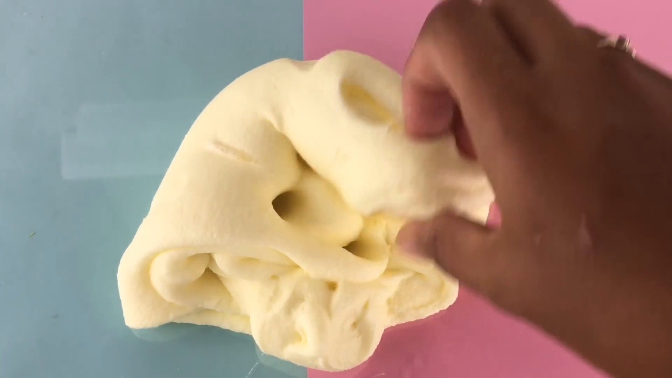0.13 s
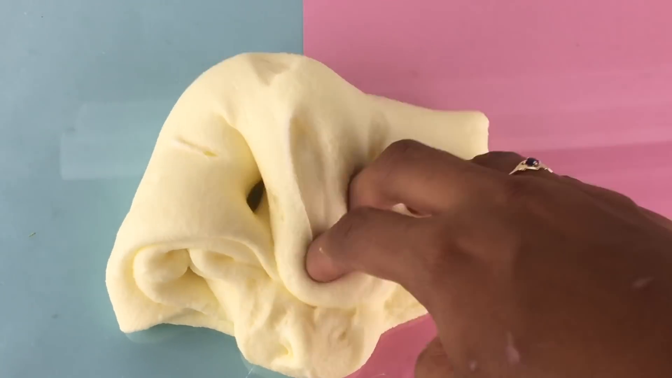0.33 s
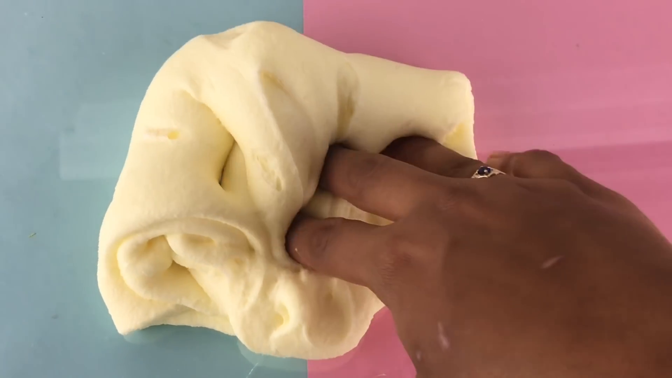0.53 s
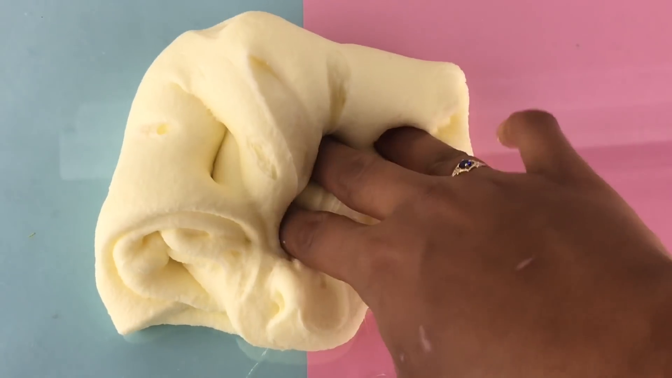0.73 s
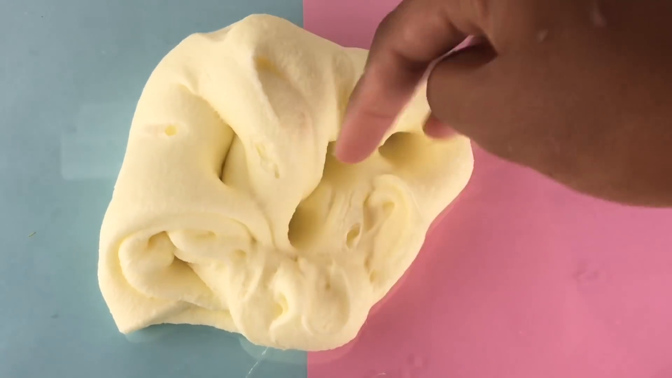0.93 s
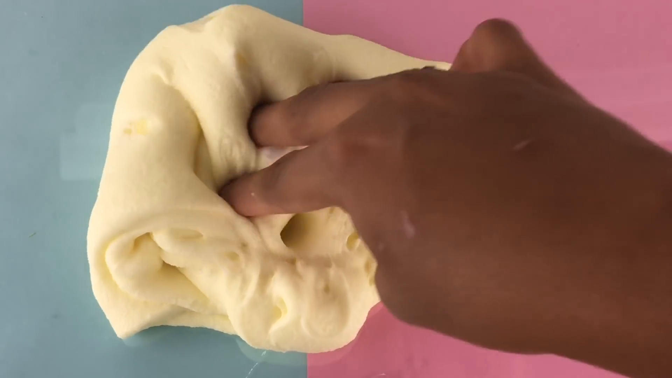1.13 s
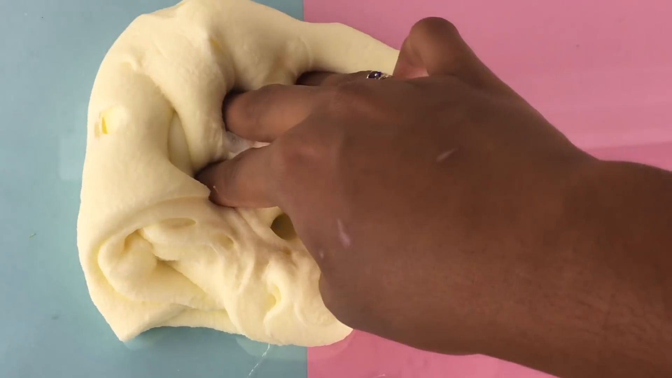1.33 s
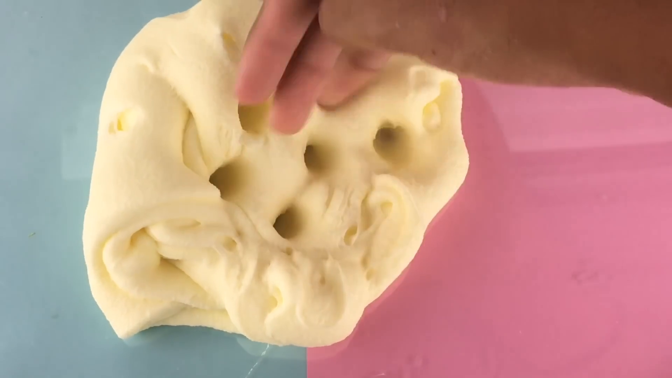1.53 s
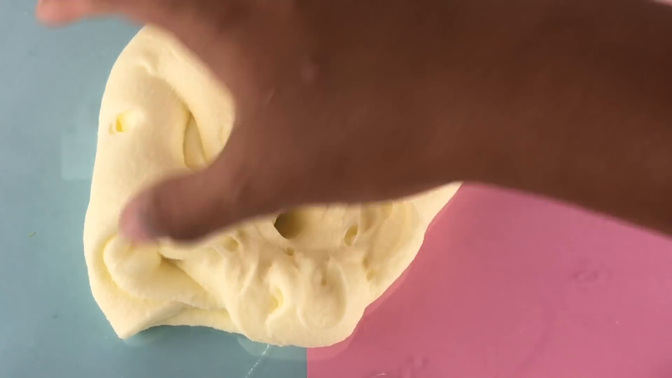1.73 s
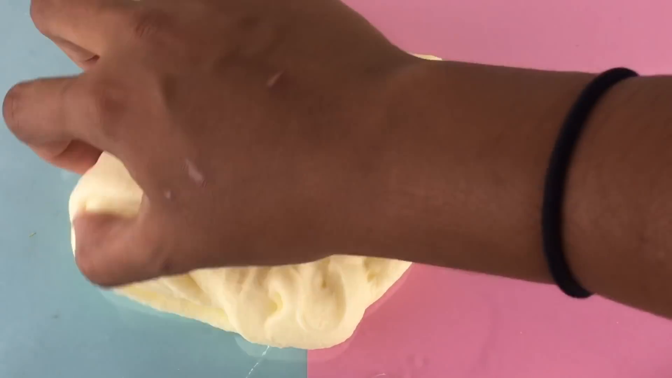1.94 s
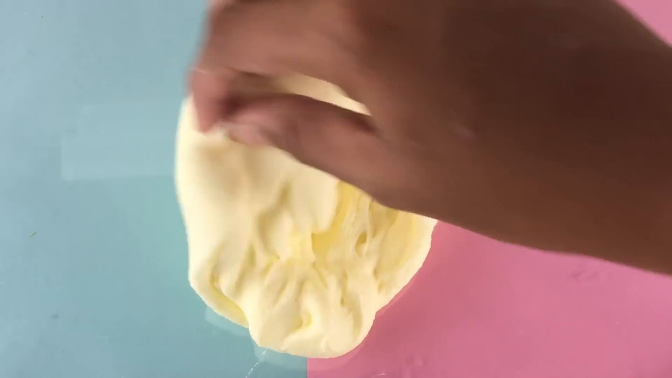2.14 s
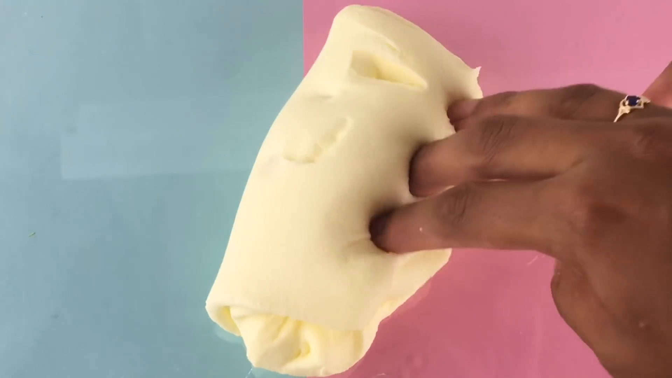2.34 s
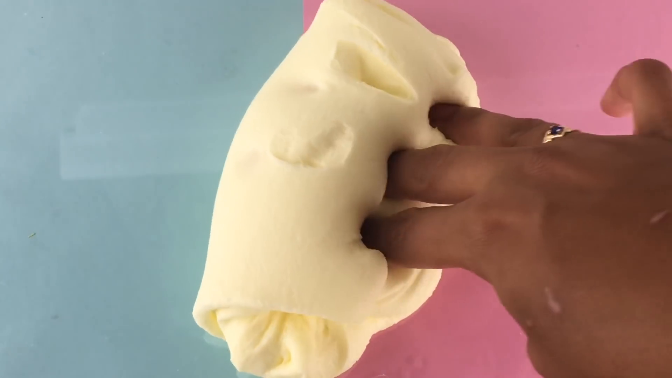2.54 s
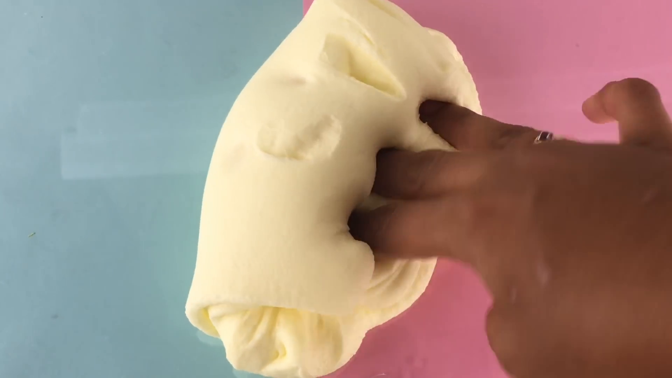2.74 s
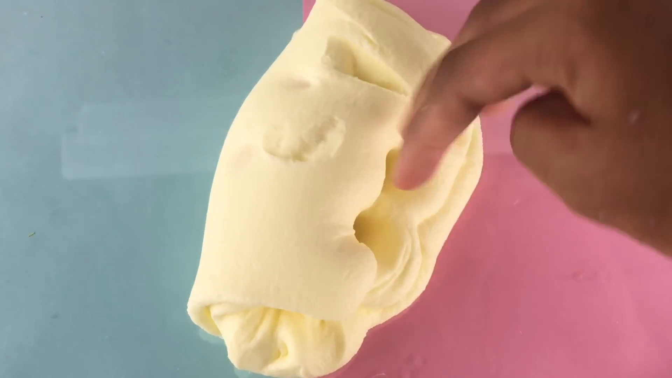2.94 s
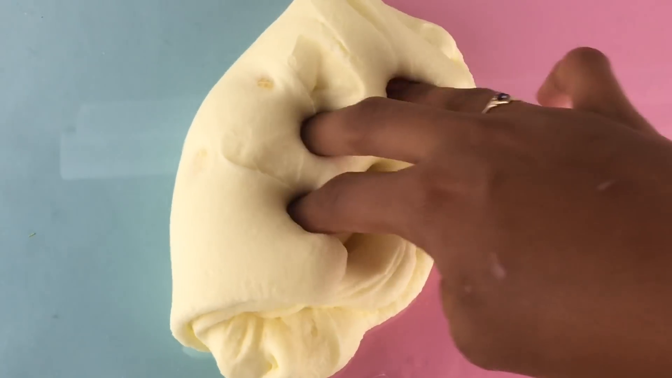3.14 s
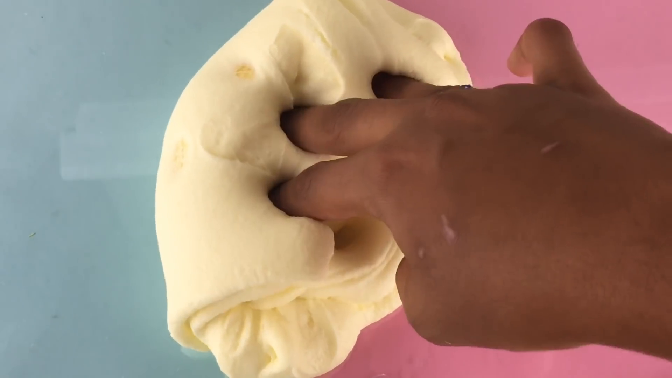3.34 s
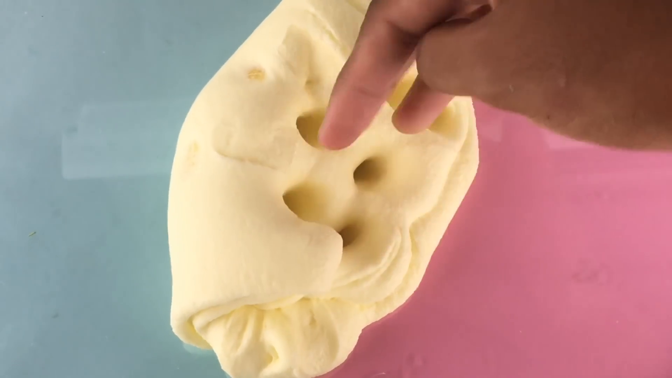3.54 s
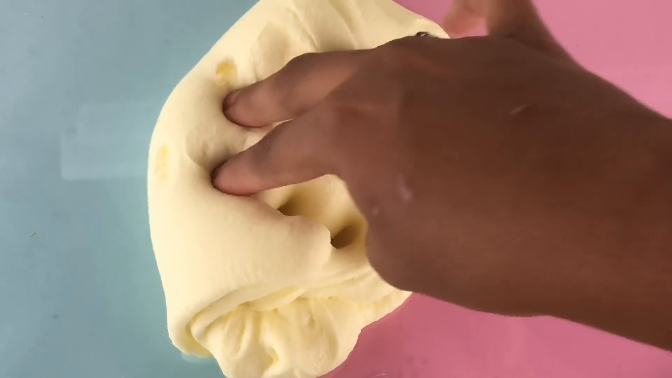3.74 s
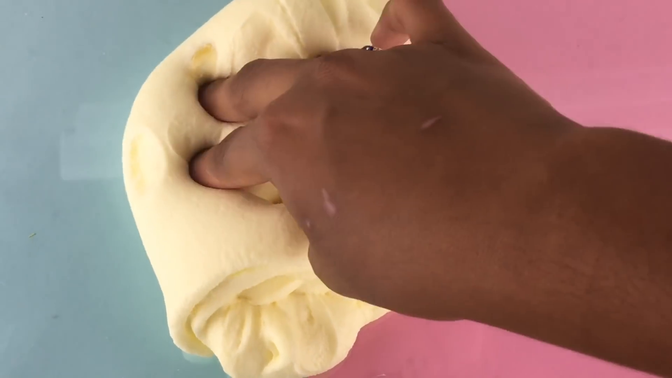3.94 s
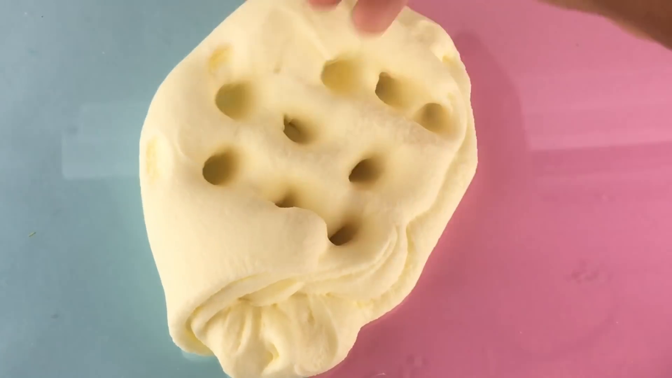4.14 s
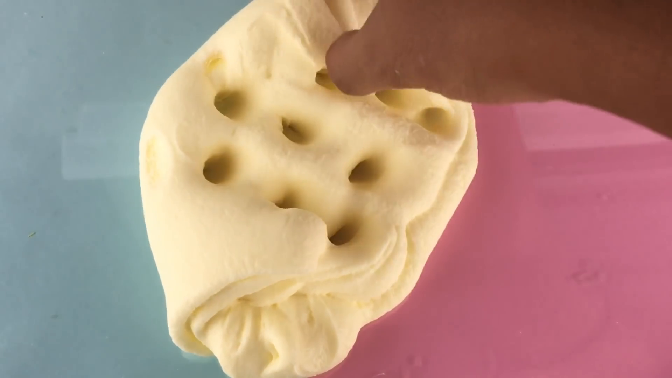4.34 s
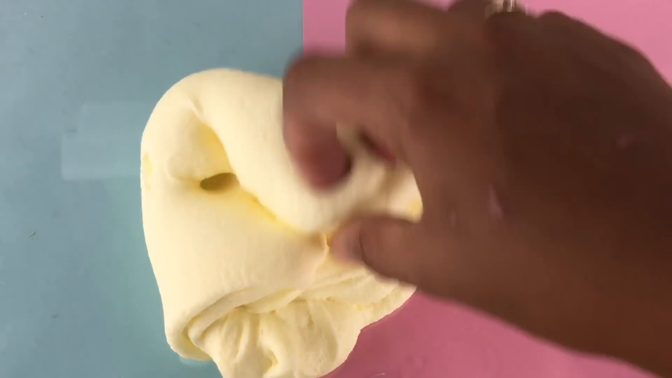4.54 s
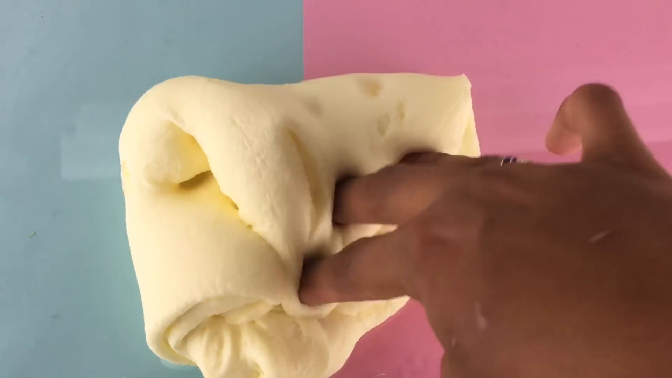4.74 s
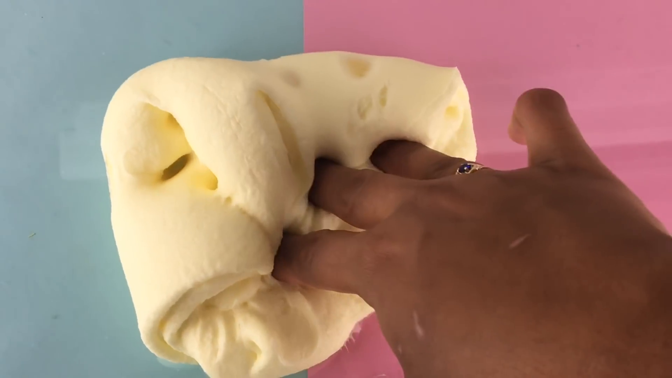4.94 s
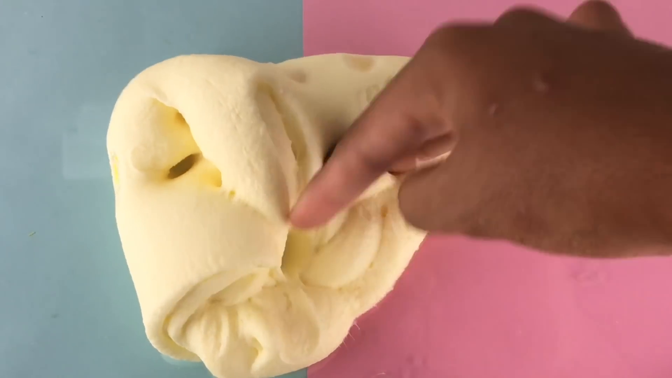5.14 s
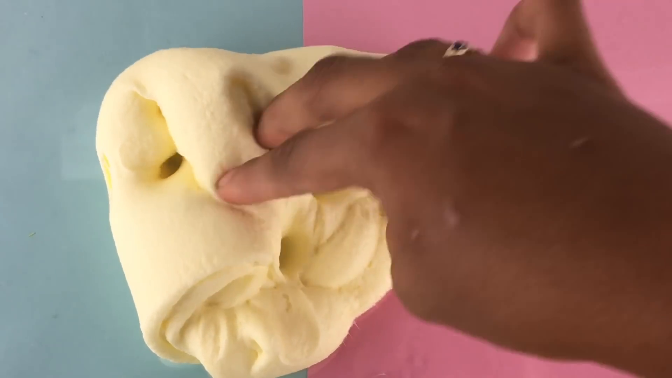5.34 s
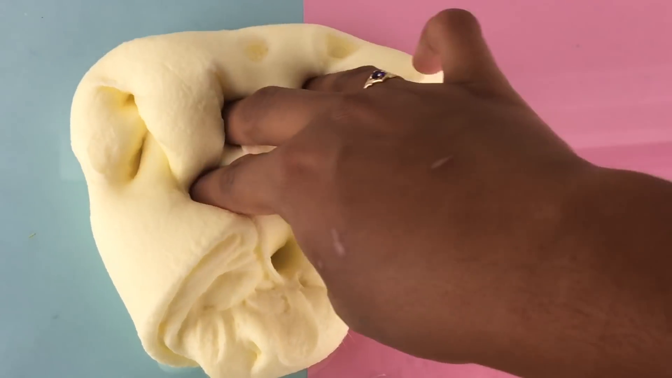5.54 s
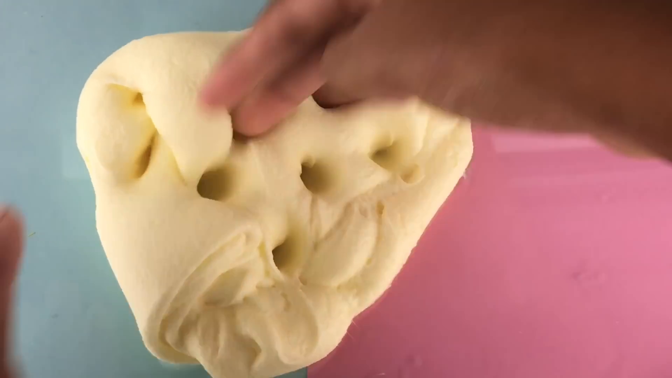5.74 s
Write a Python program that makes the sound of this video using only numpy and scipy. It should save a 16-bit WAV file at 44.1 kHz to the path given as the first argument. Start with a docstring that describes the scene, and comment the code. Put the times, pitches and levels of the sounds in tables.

```python
"""Fingers work thick slime on a table, close to the microphone in a quiet room; 5.9 s.
First the hand rubs the lump: skin peels off with a faint fizz, tiny bubbles tick.
From 0.85 s on, a finger pulls out seven times: the hole unseals with a wet snap and a hollow ring,
the lump recoils, then drops back with a soft thud; on most pulls a sticky film rips.
Between pulls the hand grips and folds the lump, and squeezed air pockets burst with a duller ping."""
import sys
import numpy as np
from scipy import signal
from scipy.fft import rfft, irfft, next_fast_len
from scipy.io import wavfile
from scipy.ndimage import map_coordinates

SR = 44100
rng = np.random.default_rng(int(sys.argv[2]) if len(sys.argv) > 2 else 0)


def put_to_file(sound):
    """Save the sound as 16-bit audio at rate SR, in the file named by the first command-line argument."""
    columns = np.atleast_2d(sound).T  # one column per channel
    safe = np.clip(columns, -1, 1)
    whole_steps = np.round(safe * 32767)
    wavfile.write(sys.argv[1], SR, whole_steps.astype(np.int16))


N = 259749
AGE_S = np.arange(SR // 10) / SR  # time axis of one short event

# fingers pulling out: unseal_s, fizz_db, recoil_db, drop_delay_s, drop_db
PULLS = [(0.852, -43.5, -29, 0.047, -40), (1.493, -47, -38, 0.1, -43.5), (2.826, -47, -35.5, 0.051, -41),
         (3.475, -48, -49.5, 0.031, -35.5), (4.081, -51.5, -38, .040, -35.5),
         (5.133, -50, -35.5, .087, -42.5), (5.746, -44.5, -38.5, 0.1, -41)]
# hand gripping, folding or sliding over the lump: start_s, length_s, fizz_db
RUBS = [(0, 0.23, -62), (0.256, 0.05, -91), (0.403, .11, -57.5), (1.966, 0.11, -48), (2.266, 0.043, -59),
        (3.168, 0.075, -63.5), (4.413, 0.024, -51), (4.529, .08, -57.5), (4.878, 0.09, -58),
        (5.392, 0.016, -55.5)]


def amp(db):
    return 10 ** (np.asarray(db) / 20)


def unit_rms(x):
    return x / np.sqrt(np.mean(x ** 2) + 1e-20)


def burst(x, level_db, window_s=0.0125):
    """Scale x to the energy of rms level_db held for window_s."""
    return amp(level_db) * x * np.sqrt(window_s * SR / (np.sum(x ** 2) + 1e-20))


def along(points, hz):
    """Interpolate (hz, value) points on a log frequency axis."""
    point_hz, values = np.transpose(points)
    return np.interp(np.log(hz + 1), np.log(point_hz), values)


def filtered(x, response):
    size = next_fast_len(len(x) + 8192)
    return irfft(rfft(x, size) * response(np.fft.rfftfreq(size, 1 / SR)), size)[:len(x)]


def resonate(x, hz, q):
    return filtered(x, lambda f: 1j * f * hz / q / (hz * hz - f * f + 1j * f * hz / q))


def muffle(x, edge_hz):
    """Low-pass: slime soaks up treble."""
    return signal.sosfilt(signal.butter(4, edge_hz, fs=SR, output="sos"), x)


def add(track, start_s, x):
    start = max(round(start_s * SR), 0)
    track[start:start + len(x)] += x[:max(len(track) - start, 0)]


def crackle(size, spread_db):
    """Countless micro-ruptures of unequal strength."""
    noise = rng.standard_normal(size)
    strength = amp(spread_db * np.clip(rng.standard_normal(size), -2.5, 2.5))
    return unit_rms(noise * strength)


def ring(hz, t60_s, attack_s, glide=0):
    """Damped tone; glide lifts the pitch, as when a cavity opens."""
    pitch_hz = hz * (1 + glide * (np.minimum(AGE_S / t60_s, 1) - 1 / 4))
    envelope = amp(-60 * AGE_S / t60_s) * (1 - np.exp(-AGE_S / attack_s))
    return np.sin(2 * np.pi * np.cumsum(pitch_hz) / SR) * envelope


def stroke(start_s, end_s, level_db, rise_db_per_s, fall_db_per_s):
    """Gain of one hand movement, held from start_s to end_s."""
    t = np.arange(N) / SR
    before_s, after_s = np.maximum(start_s - t, 0), np.maximum(t - end_s, 0)
    return amp(level_db - rise_db_per_s * before_s - fall_db_per_s * after_s)


def hush(level_db=-63.5):
    """Low room rumble and microphone hiss."""
    # noise floor spectrum: freq_hz, density_db
    spectrum = [(12, -28.5), (20, 3), (293, -14.5), (513, -17.5), (574, -25), (642, -18), (2020, -25),
                (3630, -25.5), (16000, -30.5)]
    return amp(level_db) * unit_rms(filtered(rng.standard_normal(N), lambda f: amp(along(spectrum, f))))


def room(x):
    """Reflections change as the hand moves: a new random tail every third of a second."""
    # reverberation time: freq_hz, t60_s
    decay_times = [(100, 0.52), (250, 0.21), (700, .45), (2000, 0.34), (5000, 0.38), (10000, 0.25),
                   (16000, 0.27)]
    # tail level re direct sound: freq_hz, gain_db
    gains = [(50, -3), (140, -9), (300, -14), (700, -14), (2000, -10), (5000, -15), (10000, -16),
             (16000, -10.5)]
    out, piece = np.zeros(N), SR // 3
    for start in range(0, N, piece):
        hz, t, noise = signal.stft(rng.standard_normal(SR * 2 // 3), SR, nperseg=256)
        fade = amp(-60 * t / along(decay_times, hz)[:, None])
        energy = np.sum(fade ** 2, axis=1, keepdims=True) * t[1] * SR
        fade *= amp(along(gains, hz))[:, None] / np.sqrt(energy)
        tail = signal.istft(noise * fade, SR, nperseg=256)[1]
        near = rng.standard_normal(len(AGE_S)) * np.exp(-AGE_S / 0.0036)  # table and arm scatter first
        add(tail, 0, amp(-13) * near / np.linalg.norm(near))
        add(out, start / SR + 0.003, signal.fftconvolve(x[start:start + piece], tail))
    return out


def peel(tugs_per_s=45, tug_db=2, clumps_per_s=890, clump_db=3.2):
    """Tacky threads let go of the skin in millisecond clumps, within slower tugs."""
    # fizz spectrum: freq_hz, density_db
    spectrum = [(200, -8.5), (600, 6), (1500, -3.5), (3000, -3), (6000, -5.5), (10000, -2), (13000, 4.5),
                (16000, -0.5)]
    t = np.arange(N) / SR
    pulling = sum(stroke(unseal_s - 0.016, unseal_s + 0.044, db, rise_db_per_s=849.5, fall_db_per_s=300)
                  for unseal_s, db, *_ in PULLS)
    rubbing = sum(stroke(start_s, start_s + length_s, db, rise_db_per_s=346, fall_db_per_s=170)
                  for start_s, length_s, db in RUBS)
    tugs = map_coordinates(rng.standard_normal(N // 100), [t * tugs_per_s])
    clumps = map_coordinates(rng.standard_normal(N // 10), [t * clumps_per_s])
    threads = crackle(N, spread_db=2.5) * amp(tug_db * tugs + clump_db * clumps)
    fizz = filtered(threads, lambda f: amp(along(spectrum, f)))
    return unit_rms(fizz) * (pulling + rubbing)


def thuds(recoil_hz=150, drop_hz=158):
    """The soft mass pushes the table, then settles with a dull shudder; each pull jolts it twice."""
    # lump flopping or pressed onto the table: start_s, level_db, pitch_hz
    flops = [(1.2162, -47, 180), (1.514, -37, 300), (1.9239, -33.5, 255), (3.1298, -42.5, 170),
             (4.222, -48, 145), (4.333, -30.5, 176)]
    recoils = [(unseal_s, db, recoil_hz) for unseal_s, _, db, _, _ in PULLS]
    drops = [(unseal_s + delay_s, db, drop_hz) for unseal_s, _, _, delay_s, db in PULLS]
    settling = np.exp(-AGE_S / 0.025) * np.linspace(1, 0, len(AGE_S))
    out = np.zeros(N)
    for start_s, level_db, hz in flops + recoils + drops:
        push = ring(hz, t60_s=2 / hz, attack_s=0.029, glide=0.075)  # lossy slime: about one cycle
        shudder = resonate(rng.standard_normal(len(AGE_S)) * settling, hz * 1.1, q=0.94)
        add(out, start_s, burst(push, level_db) + burst(muffle(shudder, hz * 2), level_db - 7.5))
    return out


def snap(hz, decay_s, q, rim_gain):
    """A film bursts: its rim rings briefly while the shreds crackle away."""
    rim = ring(hz, t60_s=decay_s * 2, attack_s=0.00004)
    envelope = np.exp(-AGE_S / decay_s) + 0.055 * np.exp(-AGE_S / 0.0055)
    shreds = resonate(crackle(len(AGE_S), spread_db=2.5) * envelope, hz, q)
    low_cut = signal.butter(4, 0.52 * hz, "high", fs=SR, output="sos")  # shreds too small to radiate bass
    return rim_gain * unit_rms(rim) + unit_rms(signal.sosfilt(low_cut, shreds))


def stray_bubbles(rate_per_s=20, level_db=-60, spread_db=7.5, pitch_hz=8400, smack_re_click_db=-6):
    """Faint bubbles scattered through the rubs, as rows for ticks()."""
    rows = []
    for start_s, length_s, _ in RUBS:
        draws = rng.uniform(-1, 1, (16, 4))
        for when, size, pitch, wet in draws[:round(length_s * rate_per_s)]:
            rows.append((start_s + length_s * (when + 1) / 2, level_db + spread_db * size,
                         pitch_hz * 1.6 ** pitch, smack_re_click_db + 8 * wet))
    return rows


def ticks():
    """Bubbles too small for a hollow ring, and the bright edge of some buried pockets bursting: a crisp click
    and a short wet smack."""
    # clearest surface bubbles, plus the crisp top of the buried pockets bursting at 1.216, 2.169, 2.343 and
    # 3.13 s: start_s, click_db, pitch_hz, smack_re_click_db
    bubbles = [(0.1083, -53.5, 2320, -5), (0.147, -56.5, 13300, -11), (.198, -66.5, 2000, 6),
               (.2205, -57, 12000, -2), (0.274, -50.5, 9600, -28), (0.343, -56.5, 5000, -5),
               (0.3722, -48, 12800, -36), (0.52, -58.5, 3500, -8.5), (1.216, -47, 9200, -0.5),
               (1.903, -54.5, 12200, -27), (1.925, -45.5, 3570, -2.5), (2.13, -54, 7300, -3),
               (2.169, -50.5, 12000, -8), (2.3431, -54, 12460, 1.5), (2.544, -59.5, 9100, -7),
               (3.13, -44.5, 9600, -14.5), (3.2244, -52.5, 9300, -7.5), (3.725, -57, 13130, -9),
               (4.1217, -40, 3660, 0), (4.3306, -54, 3460, 4.5), (4.609, -55.5, 2950, 3.5),
               (4.6205, -45.5, 4400, -11.5), (4.6877, -50.5, 11500, -14.5), (4.745, -54.5, 10900, -16),
               (4.961, -54, 12200, -24), (5.3884, -35.5, 13100, -18.5), (5.4769, -43, 12200, -20)]
    out = np.zeros(N)
    for start_s, click_db, pitch_hz, smack_re_click_db in bubbles + stray_bubbles():
        click = snap(pitch_hz, decay_s=0.0003, q=1, rim_gain=0.3)
        splash = crackle(len(AGE_S), spread_db=-2.5) * np.exp(-AGE_S / 0.0075)
        smack = muffle(resonate(splash, hz=805, q=1.5), edge_hz=2310)
        add(out, start_s, burst(click, click_db) + burst(smack, click_db + smack_re_click_db))
    return out


def rips():
    """A film tears in a swelling run of micro-snaps that also shake the pocket behind it."""
    # sticky films: peak_s, rip_db, rip_hz, swell_s, pocket_db, pocket_hz
    films = [(1.54, -38.5, 3600, 0.01, -27, 1200), (1.577, -26.5, 7700, 0.005, -29, 904),
             (1.995, -41, 10000, 0.0065, -56, 795), (3.509, -19.5, 4245, 0.0047, -23, 580),
             (5.179, -26, 4500, 0.0027, -33, 527), (5.779, -19, 7100, 0.0039, -27, 740)]
    out, middle_s = np.zeros(N), AGE_S.mean()
    for peak_s, rip_db, rip_hz, swell_s, pocket_db, pocket_hz in films:
        run = crackle(len(AGE_S), spread_db=5.5) * np.exp(-np.abs(AGE_S - middle_s) / swell_s)
        tear = resonate(run, rip_hz, q=0.8)
        hollow = resonate(resonate(run, pocket_hz, q=0.88), pocket_hz, q=0.83)
        add(out, peak_s - middle_s, burst(tear, rip_db) + burst(hollow, pocket_db))
    return out


def air_pocket(snap_db, snap_hz, decay_s, edge_hz, pocket_db, pocket_hz, t60_s, overtone_re_pocket_db):
    """The seal snaps, then air rushes into the hollow and rings it."""
    # overtones of the hollow: pitch_ratio, level_db, t60_ratio
    modes = [(1.751, 5, 0.9), (2.5, 5.5, 0.79), (3.099, 0, 0.88)]
    out = np.zeros(len(AGE_S))
    q = 1 + 2 * (snap_hz / edge_hz) ** 3  # splat far below the treble edge, ping near it
    add(out, 0, burst(muffle(snap(snap_hz, decay_s, q, rim_gain=0.21), edge_hz), snap_db))
    add(out, 0.00045, -burst(ring(pocket_hz, t60_s, attack_s=0.0061, glide=0.05), pocket_db))
    overtones = np.zeros(len(AGE_S))
    for pitch_ratio, level_db, t60_ratio in modes:  # uneven walls: slightly different each time
        gain = amp(level_db + rng.normal(0, 1.5))
        mode_hz = pocket_hz * pitch_ratio * rng.lognormal(0, 0.04)
        overtones += gain * ring(mode_hz, t60_ratio * t60_s, attack_s=0.00051)
    return out + burst(overtones, pocket_db + overtone_re_pocket_db)


def pops(open_edge_hz=14000, buried_snap_hz=3050, buried_t60_s=0.0071):
    """Open finger holes burst brightly, pockets under the slime with a duller ping."""
    # finger holes unsealing:
    # start_s, snap_db, snap_hz, decay_s, pocket_db, pocket_hz, t60_s, overtone_re_pocket_db
    holes = [(0.8528, -19.5, 5625, 0.00057, -21.5, 547, 0.0059, -3.5),
             (0.8683, -29.5, 4770, .0005, -35.5, 664, .01, -6),
             (0.8862, -29, 8500, 0.00052, -43.5, 648, .01, -8),
             (1.492, -40.5, 11000, 0.0026, -40, 475, 0.012, -9),
             (1.5337, -33.5, 3040, 0.0056, -26.5, 612, 0.0084, -6.5),
             (2.8242, -25.5, 5386, 0.00042, -24, 551, 0.0076, -5),
             (2.8458, -25, 4320, 0.0018, -32.5, 503, 0.0079, 0),
             (2.876, -35, 4980, 0.0034, -35.5, 368, 0.017, -5),
             (3.4746, -13, 5590, 0.0013, -19.5, 640, 0.018, -3),
             (4.08, -17.5, 4900, 0.00091, -28.5, 631, 0.0075, 4.5),
             (4.0933, -41, 2990, 0.00308, -28, 818, 0.0088, -12.5),
             (5.1304, -23, 5220, 0.00092, -24.5, 546, 0.0092, -1.5),
             (5.1554, -26, 4680, 0.0011, -32.5, 663, 0.011, 4),
             (5.2181, -43.5, 9000, .004, -41, 616, 0.0056, -4),
             (5.7465, -18.5, 4670, 0.0027, -29.5, 500, 0.011, 7),
             (5.7711, -11.5, 6300, 0.00024, -39, 832, 0.014, 9.5)]
    # buried pockets squeezed until they burst:
    # start_s, snap_db, decay_s, edge_hz, pocket_db, pocket_hz, overtone_re_pocket_db
    buried = [(1.2163, -31, 0.0074, 3680, -49.5, 720, 3.5), (2.1682, -52, 0.0044, 7020, -55.5, 770, 3.5),
              (2.3431, -44.5, .001, 7500, -47, 550, -1), (2.4989, -69, .001, 6080, -54.5, 750, -10.5),
              (3.13, -45, 0.0054, 3780, -46, 626, 3.5), (3.8154, -55, 0.00093, 4850, -40.5, 571, -6.5),
              (4.8535, -72, 0.0018, 5050, -52.5, 800, -9.5), (5.843, -56, .0024, 3900, -37, 640, -5)]
    out = np.zeros(N)
    for start_s, snap_db, snap_hz, decay_s, *hollow in holes:
        add(out, start_s, air_pocket(snap_db, snap_hz, decay_s, open_edge_hz, *hollow))
    for start_s, snap_db, decay_s, edge_hz, pocket_db, pocket_hz, overtone_re_pocket_db in buried:
        add(out, start_s, air_pocket(snap_db, buried_snap_hz, decay_s, edge_hz,
                                     pocket_db, pocket_hz, buried_t60_s, overtone_re_pocket_db))
    return out


def scene():
    slime = pops() + rips() + ticks() + thuds() + peel()
    return (slime + room(slime) + hush())[None]


def record(dry):
    """Soft clip at full scale, then band limit."""
    top_hz, slope_width_hz = 16000, 400
    rounded = dry[0] / (1 + dry[0] ** 6) ** (1 / 6)
    return filtered(rounded, lambda f: np.clip((top_hz - f) / slope_width_hz + 0.5, 0, 1))[None]


dry = scene()
out = record(dry)
put_to_file(out)
```